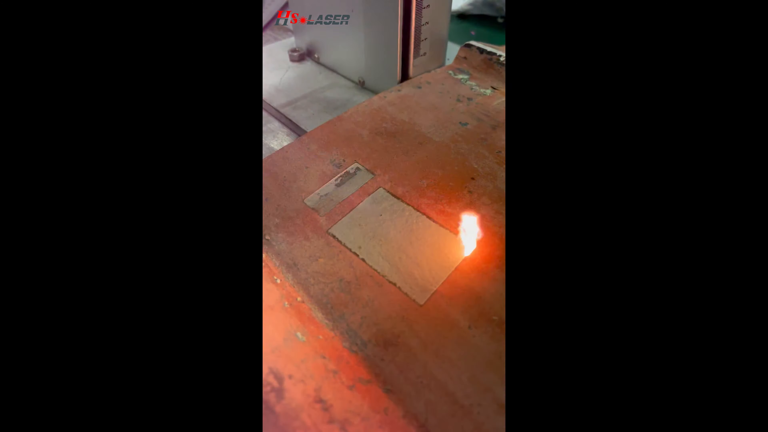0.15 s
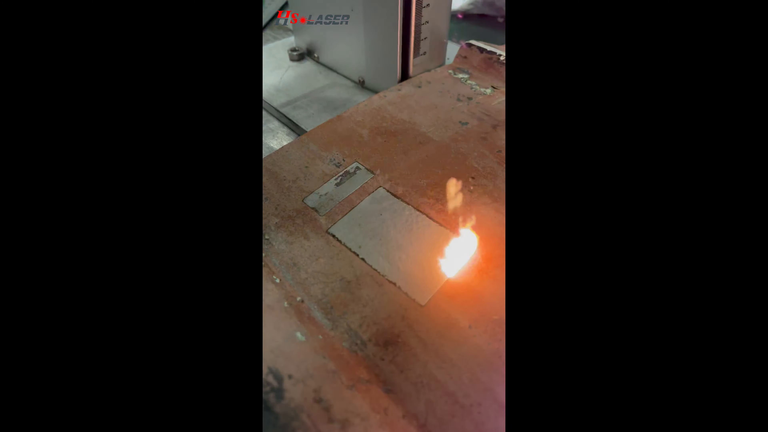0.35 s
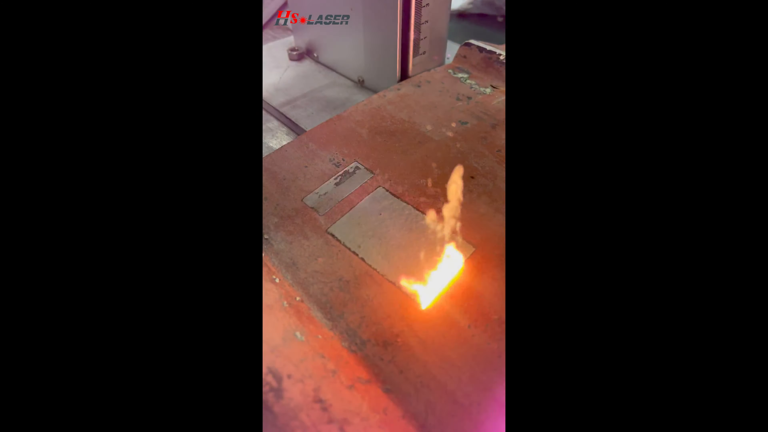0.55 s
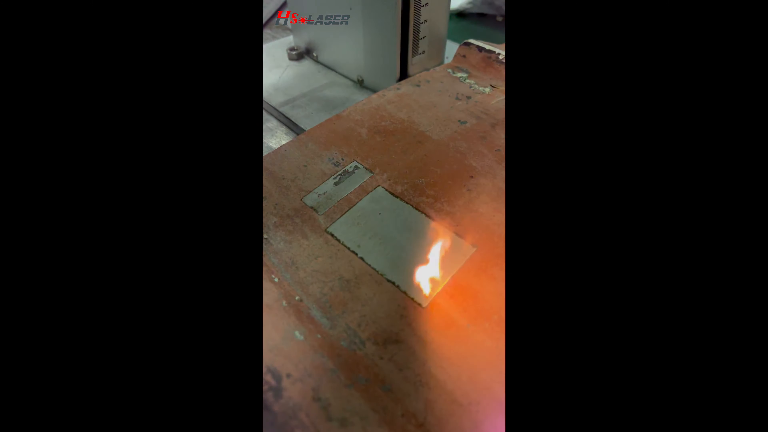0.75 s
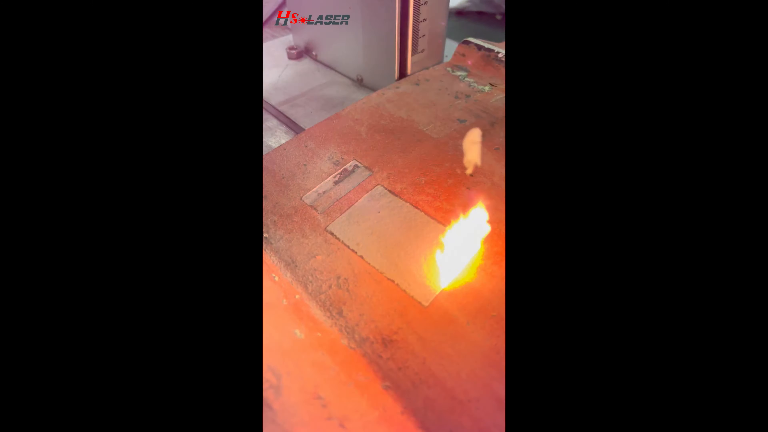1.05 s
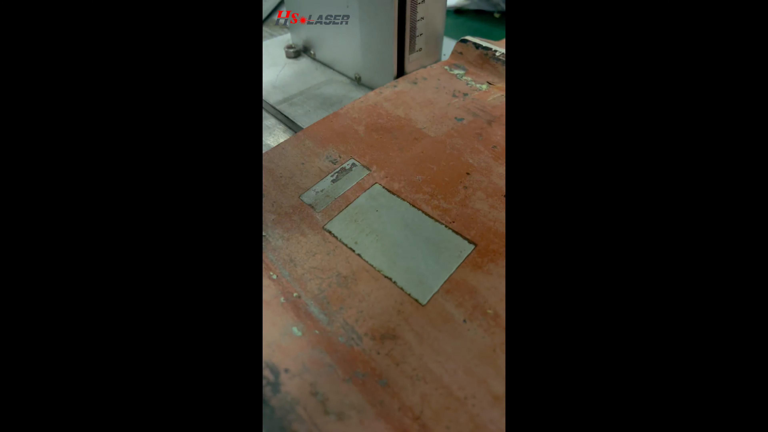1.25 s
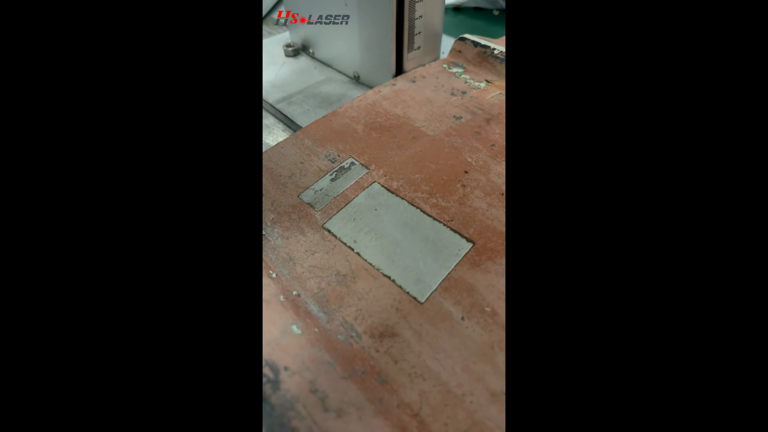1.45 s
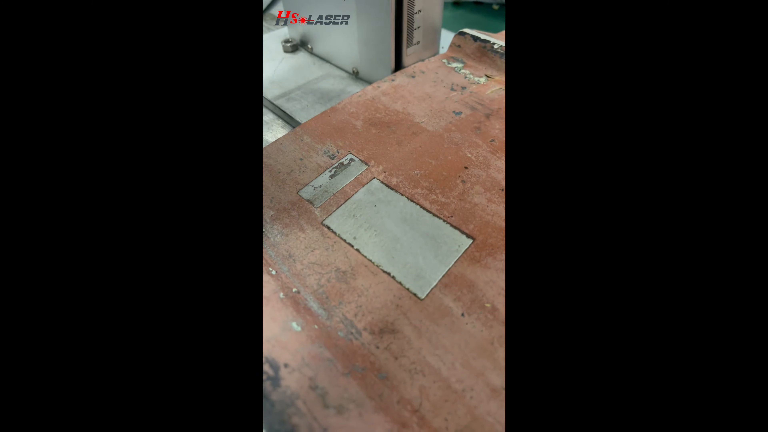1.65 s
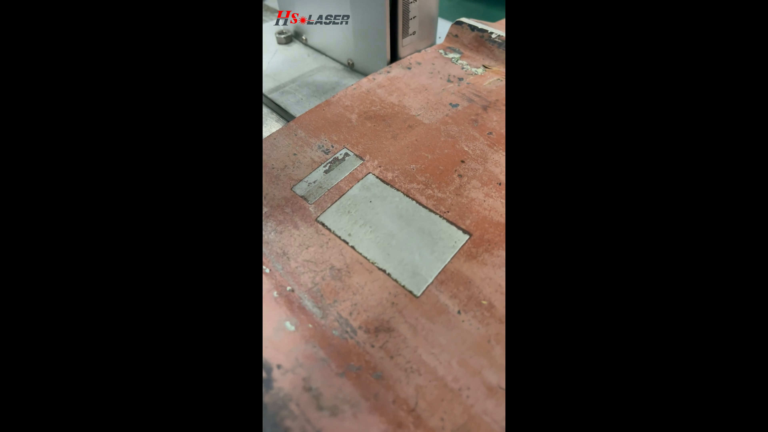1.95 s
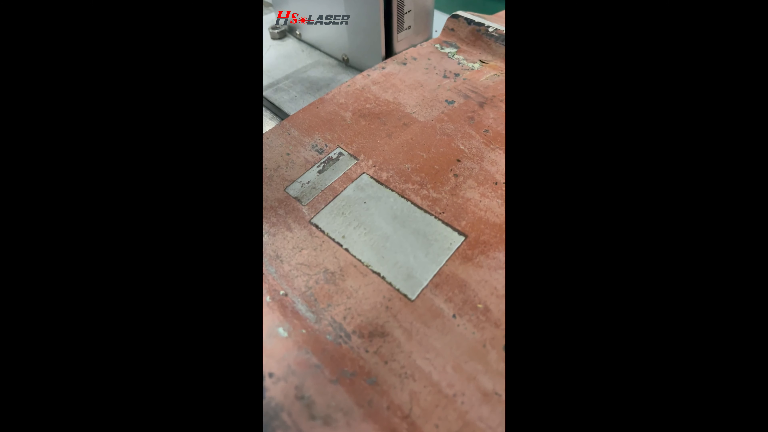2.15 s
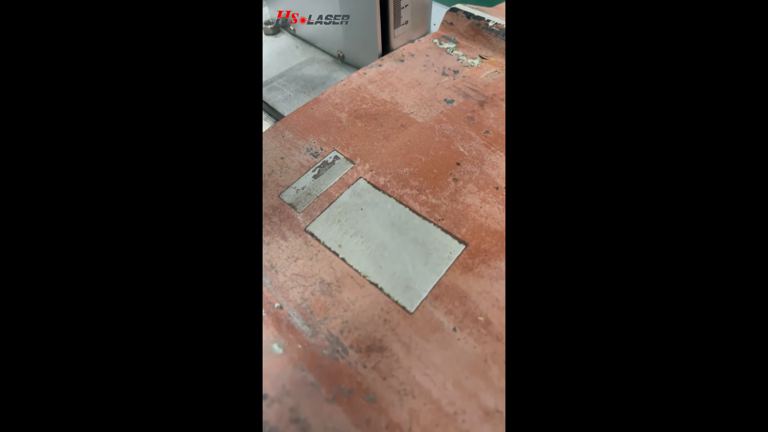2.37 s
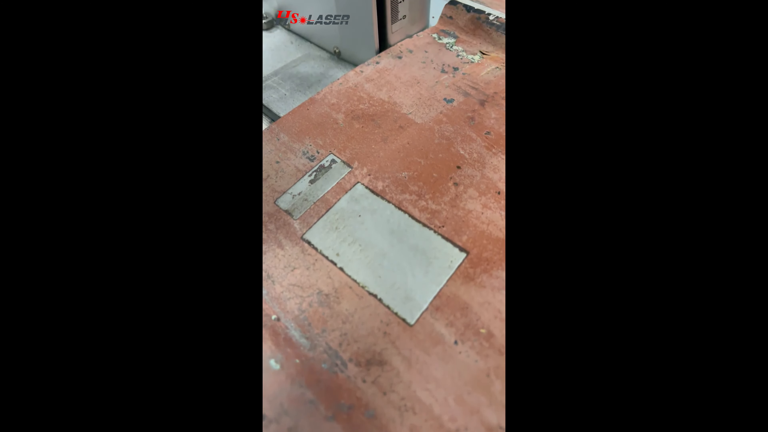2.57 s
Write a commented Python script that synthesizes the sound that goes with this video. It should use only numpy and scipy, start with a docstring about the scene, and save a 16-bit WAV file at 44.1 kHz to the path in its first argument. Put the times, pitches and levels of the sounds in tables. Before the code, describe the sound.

Close phone pickup in a workshop: a cleaning laser rasps and sputters over painted metal with fluttering flame, cuts off at once, and the machine's fans carry on, joined by rushing air and a deeper roar.

```python
"""A harsh buzz close to a phone in a workshop, cut off at once; then fans alone, their low roar swelling.
A cleaning laser sweeps to and fro over a painted steel part. On each stroke the paint flares and goes out:
both edges push the air as pulses and make the flame flutter as shaped noise; bursts of grainy noise crackle.
The part rings and the room answers. The fans are coloured noise throughout; a rush of air and then a low
roar rise after the stop, with one faint tick."""
import sys
import numpy as np
from scipy import signal
from scipy.fft import rfft, irfft, next_fast_len
from scipy.io import wavfile
from scipy.ndimage import uniform_filter1d

SR = 44100
rng = np.random.default_rng(int(sys.argv[2]) if len(sys.argv) > 2 else 0)


def transcribe(signal):
    """Save signal, clipped to [-1, 1], as a 16-bit WAV file at the path in sys.argv[1]."""
    frames = np.atleast_2d(signal).T
    limited = np.clip(frames, -1, 1)
    pcm = np.round(limited * 32767).astype(np.int16)
    wavfile.write(sys.argv[1], SR, pcm)


N = 119511

# the paint catches and goes out twice a sweep: into_sweep_s, push (signed strength: - flaring, + going out)
EDGES = [(.00495, .92), (.01516, -1.08), (.02204, .95), (.0328, -.83)]
# crackle of one sweep: into_sweep_s, level_db (relative), rise_s, decay_s
BURSTS = [(.0007, -5, 0.00087, 0.00068), (.0035, -5.5, 0.00083, 0.00072), (.005, 1, 0.00064, 0.0018),
          (0.0151, -5.5, 0.00053, 0.00088), (0.0166, -17, 0.0011, 0.0011), (0.0224, -3, 0.0012, 0.0015),
          (0.025, -7.5, 0.00056, 0.001), (0.0323, -8, .0007, 0.00049)]
# flakes of paint that burst apart from the sweep pattern: start_s, level_db (relative)
POPS = [(0.7125, 2.5), (0.7817, -5), (1.11, -10)]
SWEEP_HZ, STOP_S = 28.982, 1.181
JITTER_S, PUSH_SCATTER_DB, CRACKLE_SCATTER_DB = .00005, 1.2, 1.1  # chance from stroke to stroke
FLAME_DECAY_S, FLAME_HOLD, FLAME_HOLD_S = 0.00076, 0.88, .007  # flutter after an edge, and while burning
POP_RISE_S, POP_DECAY_S = 0.00026, 0.00045


def near(when):
    """Samples from 10 ms before to 20 ms after an event."""
    return slice(max(int((when - .01) * SR), 0), int((when + .02) * SR))


def burst(age, rise, decay):
    """Exponential growth up to age 0, then exponential decay."""
    return np.exp(np.minimum(age / rise, -age / decay))


def sweeps():
    """Every stroke until the beam stops: pushes on the air, and envelopes of the crackle and the flame."""
    t = np.arange(N) / SR
    push, spit, flame = np.zeros((3, N))
    for start in np.arange(0, STOP_S, 1 / SWEEP_HZ):
        for (at, sign), chance in zip(EDGES, rng.standard_normal((len(EDGES), 2))):
            when = start + at + JITTER_S * chance[0]
            if when < STOP_S:
                age = t[near(when)] - when
                push[int(when * SR)] += sign * undb(PUSH_SCATTER_DB * chance[1])
                flare = np.exp(-abs(age) / FLAME_DECAY_S)
                burning = FLAME_HOLD * (sign < 0) * (age < FLAME_HOLD_S)
                flame[near(when)] += abs(sign) * (age > 0) * (flare + burning)
        for (at, db, rise, decay), chance in zip(BURSTS, rng.standard_normal(len(BURSTS))):
            when = start + at
            if when < STOP_S:
                gain = undb(db + CRACKLE_SCATTER_DB * chance)
                spit[near(when)] += gain * burst(t[near(when)] - when, rise, decay)
    for when, db in POPS:
        spit[near(when)] += undb(db) * burst(t[near(when)] - when, POP_RISE_S, POP_DECAY_S)
    return push, spit, flame


# colour of the pushes on the air: freq_hz, gain_db (relative)
PUSH_COLOUR = [(20, -45), (40, -25), (58, -4), (120, 2), (250, 2), (345, 1), (400, -1.5), (500, -6),
               (600, -5.5), (690, -1.5), (800, -1), (1000, -5), (1250, -2), (1550, -4), (2200, -13),
               (4000, -24), (16000, -49)]
# colour of the crackle: freq_hz, gain_db (relative)
CRACKLE_COLOUR = [(200, -27), (1000, 1.5), (1900, 5.5), (2600, 5), (3400, -3.5), (4300, -2.5), (6500, 1),
                  (8500, -1), (10500, -2.5), (12200, -2.5), (13700, -2), (14700, -13), (16000, -1)]
# colour of the fluttering flame: freq_hz, gain_db (relative)
FLAME_COLOUR = [(30, -34), (100, -7.5), (300, -8.5), (600, -2), (1000, -3.5), (1500, 3.5), (1720, -6.5),
                (1900, 4), (2400, -6), (4000, -11.5), (16000, -28)]
# surfaces nearby that return the pushes: delay_s, gain (signed factor)
ECHOES = [(.00203, .29), (.00733, .08), (.00836, -.16)]
PUSH_DB, CRACKLE_DB, FLAME_DB = -31.5, -31.5, -34  # RMS over the whole scene
GRAIN_DB = 4.2  # greatest swing of the grains, redrawn every 8 samples
CRACKLE_SPREAD, FLAME_SPREAD, BUZZ_WIDE_HZ = 0.51, 0.73, 1077  # side gains; where the left starts to lag
ROOM_T60_S, ROOM_PUSH_DB, ROOM_FLAME_DB, ROOM_CRACKLE_DB = 0.26, -14.5, -7, -21
NEAR_T60_S, NEAR_DB = 0.041, -14  # quick scatter of the crackle off things close by


def nearby_echoes(f):
    """Direct sound plus delayed copies, as a gain over frequency."""
    return 1 + sum(gain * np.exp(-2j * np.pi * f * delay) for delay, gain in ECHOES)


def laser():
    """Pressure pulses, fluttering flame and grainy crackle, heard with the steel and the room."""
    push, spit, flame = sweeps()
    grain_db = GRAIN_DB * np.repeat(2 * rng.random(N // 8 + 1) - 1, 8)[:N]
    grains = rng.standard_normal((2, N)) * undb(grain_db)
    crackle = level(steel(flicker(colour(spit * grains, CRACKLE_COLOUR))), CRACKLE_DB)
    flutter = level(steel(colour(flame * rng.standard_normal((2, N)), FLAME_COLOUR)), FLAME_DB)
    thumps = spectral(steel(colour(push, PUSH_COLOUR)), nearby_echoes)
    thumps = level(thumps[0], PUSH_DB)

    sent = undb(ROOM_PUSH_DB) * thumps + undb(ROOM_FLAME_DB) * flutter[0]
    sent = sent + undb(ROOM_CRACKLE_DB) * crackle[0]
    airy = spectral(sent, lambda f: f / (f + 250))  # less bass in the tail

    def tail():
        return room(airy, ROOM_T60_S) + undb(NEAR_DB) * room(crackle[0], NEAR_T60_S)

    mid = thumps + flutter[0] + crackle[0] + tail()
    side = CRACKLE_SPREAD * crackle[1] + FLAME_SPREAD * flutter[1] + tail()
    return ports(mid, side, BUZZ_WIDE_HZ, bass_side_db=-25.5)


TOP_HZ = 15750  # top of the microphone's range
FLICKER_DB, FLICKER_PER_S, BAND_STEP_HZ = 2.8, 70, 450


def flicker(x):
    """No two bursts share a colour: overlapping narrow bands of the crackle rise and fall on their own."""
    total = 0
    for hz in np.arange(0, TOP_HZ + BAND_STEP_HZ, BAND_STEP_HZ):
        band = spectral(x, lambda f: np.maximum(1 - abs(f - hz) / BAND_STEP_HZ, 0))
        total = total + band * undb(FLICKER_DB * np.clip(walk(FLICKER_PER_S), -2, 2))
    return total


# rings of the struck part: pitch_hz, t60_s, gain (factor)
RINGS = [(968, 0.033, 0.5), (1090, 0.037, 0.66), (1823, 0.045, 0.94), (2630, .025, .3), (4065, 0.024, 0.69),
         (5044, 0.0086, 1.3), (8100, 0.022, .65)]


def steel(x):
    """The part rings briefly at a few pitches: resonances added to the direct sound."""
    def response(f):
        return 1 + sum(g / (1 + 2j * np.pi * (f - hz) * t60 / np.log(1000)) for hz, t60, g in RINGS)
    return spectral(x, response)


# colour of the steady fans: freq_hz, gain_db (relative)
FANS_COLOUR = [(20, -33), (45, -7.5), (70, -3), (120, 2.5), (180, 0.5), (300, -1), (650, 0), (800, 3),
               (1050, 0), (1300, -3), (1650, -1), (1950, -8.5), (2300, -10.5), (2900, -18.5), (3900, -22),
               (4900, -19), (6500, -18), (8500, -24.5), (12000, -30.5), (14000, -29), (16000, -51)]
# colour of the rush of air: freq_hz, gain_db (relative)
RUSH_COLOUR = [(60, -39), (130, -13), (280, -13), (420, 0.5), (650, -1), (850, -2.5), (1050, -15.5),
               (1600, -21), (3000, -42), (16000, -62)]
# colour of the low turbulent roar: freq_hz, gain_db (relative)
ROAR_COLOUR = [(20, -38), (45, -23), (80, -6), (130, 1), (180, 4.5), (280, -1), (450, -4), (800, -12),
               (1050, -9.5), (1250, -12), (1550, -13.5), (2000, -26), (3000, -33.5), (5000, -39.5),
               (8500, -37), (12500, -40.5), (16000, -60)]
# swell of the rush: time_s, gain_db
RUSH_SWELL = [(1.2, -34), (1.52, -21.5), (1.62, -6.5), (1.7, -0.5), (1.8, -.5), (2.0, 2), (2.4, 1.5),
              (2.7, 3)]
# swell of the low roar, which comes later: time_s, gain_db
ROAR_SWELL = [(1.2, -24.5), (1.58, -24), (1.72, -12.5), (1.88, -8.5), (2.03, -1), (2.22, 1), (2.45, 0),
              (2.7, -0.5)]
# part of the air noise the two ports do not share: freq_hz, gain_db
FANS_SIDE = [(60, -26), (500, -30), (1000, -7), (1800, -13), (2600, -3), (3800, 2.5), (5000, 5),
             (6000, -23.5), (16000, -29)]
# balance of the machine: freq_hz, left_minus_right_db
FANS_BALANCE = [(60, 0), (110, 0.0), (200, 0.0), (380, 0.0), (700, -5.5), (1290, -5), (2380, -2),
                (4400, -3.5), (8120, 0.0), (15000, -0.5)]
FANS_DB, RUSH_DB, ROAR_DB = -34, -31.5, -25  # RMS before swell, wander and stereo
FANS_WIDE_HZ = 2184


def air(points, db):
    """Turbulence: two independent channels of coloured noise."""
    return level(colour(rng.standard_normal((2, N)), points), db)


def machine():
    """Steady fans, a little to the right; after the beam stops a rush of air rises, then a low roar."""
    t = np.arange(N) / SR
    rush_db = np.interp(t, *np.array(RUSH_SWELL).T)
    roar_db = np.interp(t, *np.array(ROAR_SWELL).T)
    fans = air(FANS_COLOUR, FANS_DB) * undb(0.15 * walk(12.8))
    rush = air(RUSH_COLOUR, RUSH_DB) * undb(rush_db + 0.55 * walk(34.95))
    roar = air(ROAR_COLOUR, ROAR_DB) * undb(roar_db)
    mid, side = fans + rush + roar
    pair = ports(mid, colour(side, FANS_SIDE), FANS_WIDE_HZ, bass_side_db=-40.0)
    halves = np.array([[.5], [-.5]])  # left up, right down by half the difference
    return spectral(pair, lambda f: undb(halves * curve(f, FANS_BALANCE)))


TICK_S, TICK_GAIN_DB, TICK_DECAY_S = 1.576, -29, .0016


def tick():
    """One faint, soft tick after the stop: a decaying snap of noise, filtered at both ends."""
    age = np.arange(N) / SR - TICK_S
    snap = rng.standard_normal((2, N)) * (age > 0) * np.exp(-abs(age) / TICK_DECAY_S)
    return undb(TICK_GAIN_DB) * spectral(snap, lambda f: f / (f + 3000) / (1 + (f / 12000) ** 4))


def room(x, t60):
    """Diffuse tail of the workshop: decaying noise of unit energy, starting after 2 ms."""
    t = np.arange(SR // 2) / SR
    tail = rng.standard_normal(len(t)) * np.exp(-np.log(1000) * t / t60) * (t > .002)
    return convolve(x, tail / np.linalg.norm(tail))


PORT_LAG_S = .000243


def ports(mid, side, wide_hz, bass_side_db):
    """Two microphone ports: the bass is mostly shared; in the treble the left lags and the two differ."""
    def lag(f):
        return np.exp(-2j * np.pi * f * PORT_LAG_S * np.clip((f - wide_hz) / 300 + .5, 0, 1))
    side = spectral(side, lambda f: np.clip((f - 500) / 350, undb(bass_side_db), 1))
    return np.vstack([spectral(mid + side, lag), mid - side])


def undb(db):
    """Amplitude factor from dB."""
    return 10 ** (np.asarray(db) / 20)


def level(x, db):
    """Scale to an RMS level in dB."""
    return x * undb(db) / np.sqrt(np.mean(x ** 2))


def curve(f, points):
    """dB at frequencies f, read from (Hz, dB) points on a log frequency axis."""
    hz, db = np.array(points).T
    return np.interp(np.log(np.maximum(f, 1)), np.log(hz), db)


def spectral(x, gain):
    """Filter by a complex gain given as a function of frequency."""
    size = next_fast_len(N + SR // 2)
    return irfft(rfft(x, size) * gain(np.arange(size // 2 + 1) * SR / size), size)[..., :N]


def colour(x, points):
    """Causal minimum-phase filter through (Hz, dB) points, by folding the cepstrum."""
    size = 8192
    cepstrum = irfft(np.log(undb(curve(np.arange(size // 2 + 1) * SR / size, points))))
    cepstrum[1:size // 2] *= 2
    cepstrum[size // 2 + 1:] = 0
    return convolve(x, irfft(np.exp(rfft(cepstrum))))


def convolve(x, response):
    """Convolve each channel with a response, kept to the scene's length."""
    return signal.fftconvolve(np.atleast_2d(x), np.atleast_2d(response), axes=-1)[:, :N]


def walk(rate):
    """Slow random wander with a spread of 1: chance steps, rate per second, smoothed twice."""
    k = max(int(SR / rate), 1)
    steps = np.repeat(rng.standard_normal(N // k + 1), k)
    wander = uniform_filter1d(uniform_filter1d(steps, k), k)[:N]
    return wander / wander.std()


def scene():
    """The laser on the steel, the machine's air and the tick."""
    return laser() + machine() + tick()


def record(dry):
    """The phone cuts the top: a steep low-pass."""
    return signal.sosfilt(signal.ellip(10, .2, 80, TOP_HZ, fs=SR, output="sos"), dry)


dry = scene()
out = record(dry)
transcribe(out)
```